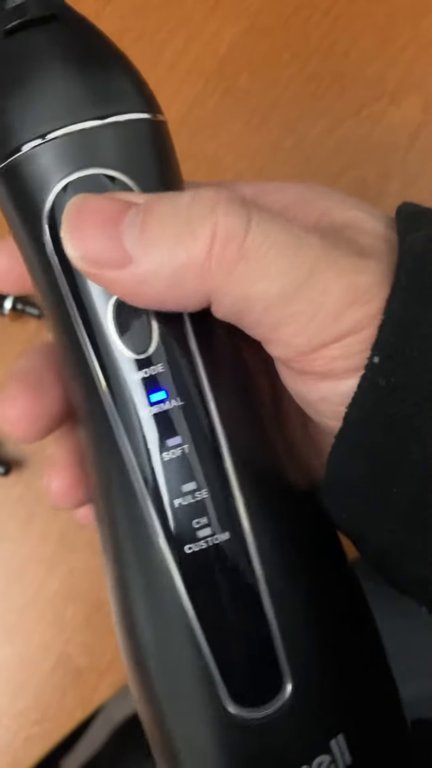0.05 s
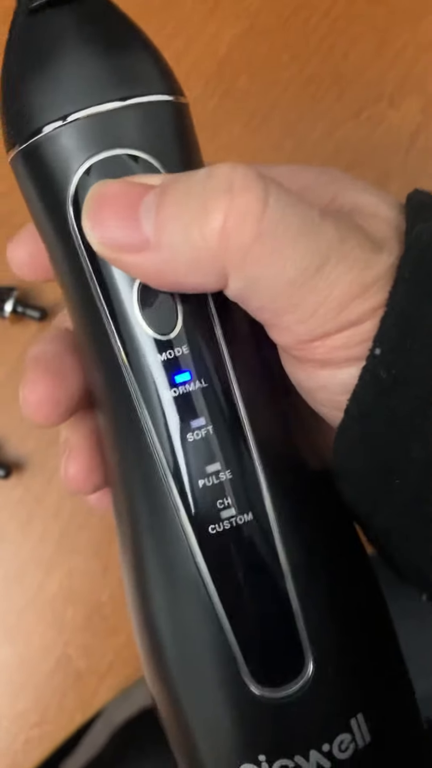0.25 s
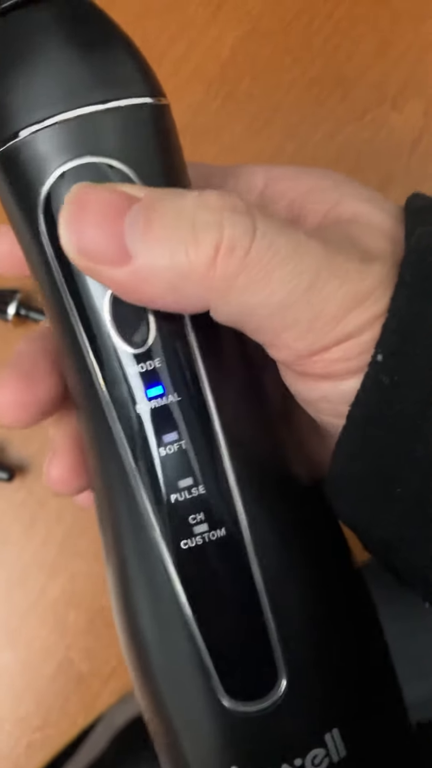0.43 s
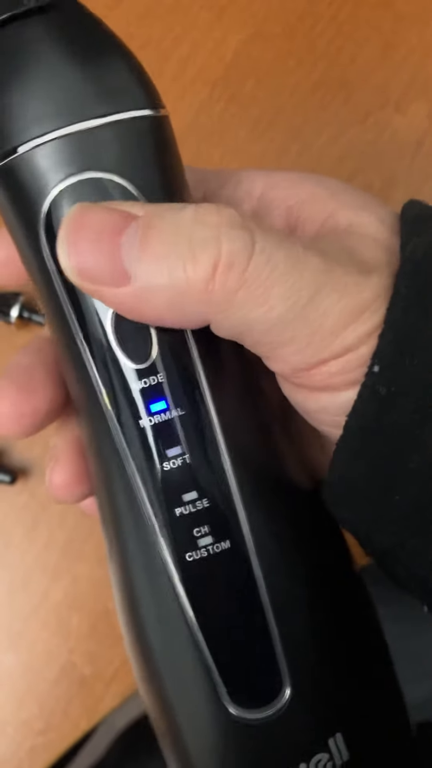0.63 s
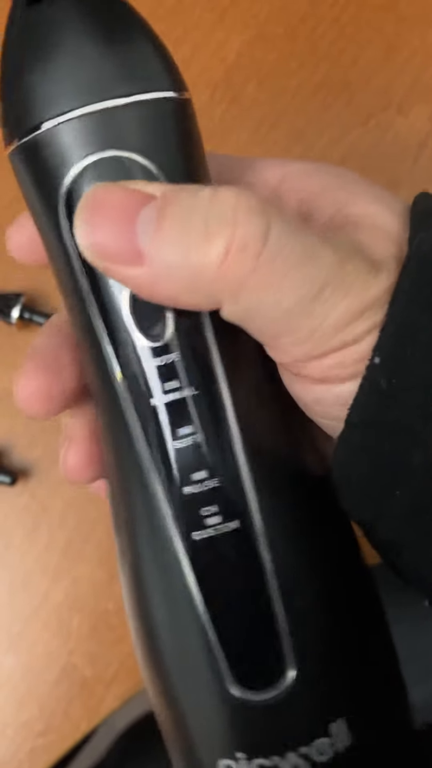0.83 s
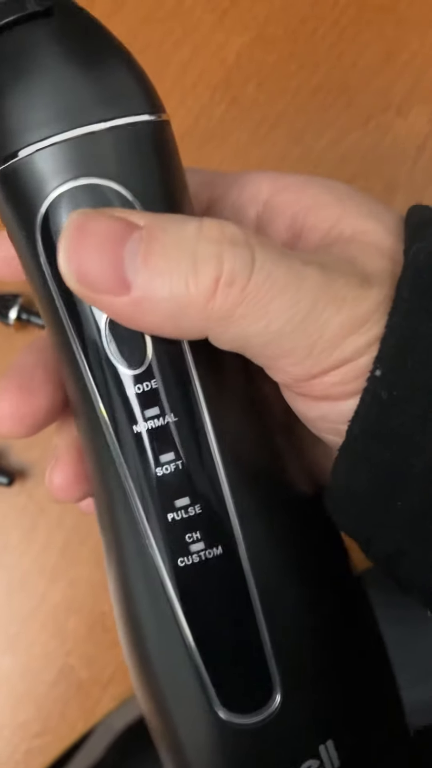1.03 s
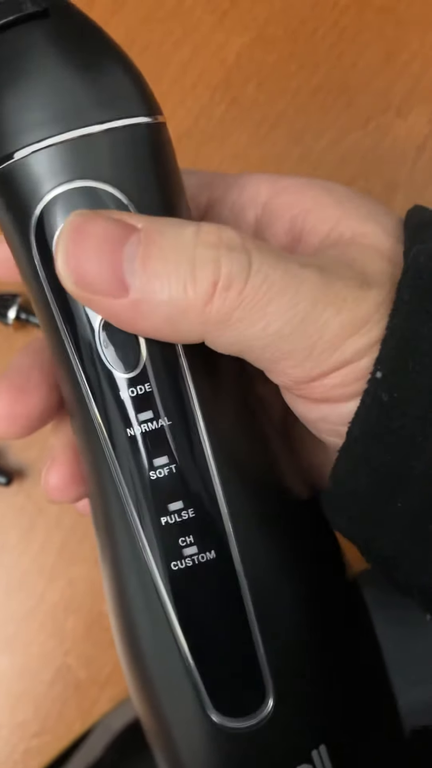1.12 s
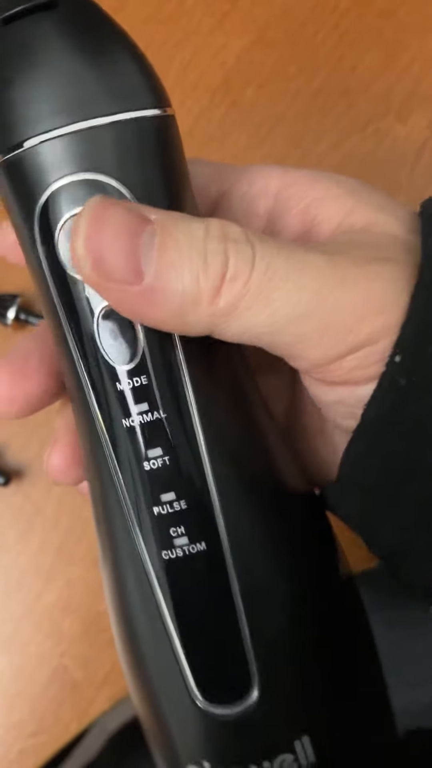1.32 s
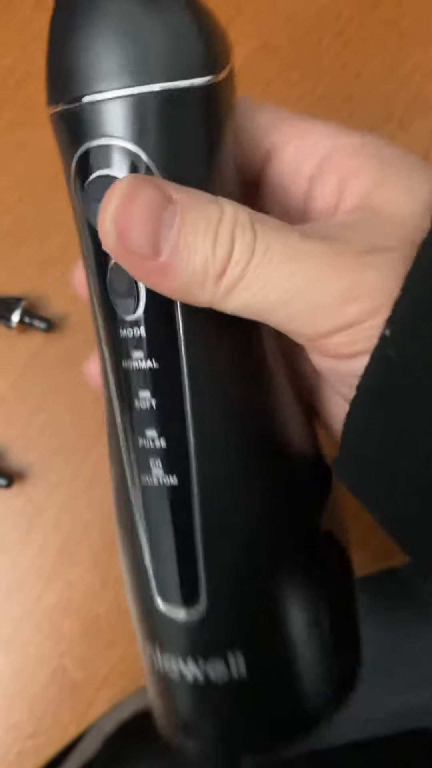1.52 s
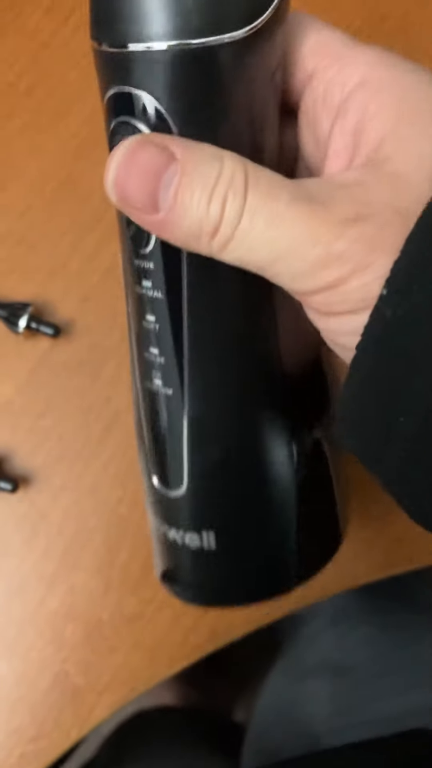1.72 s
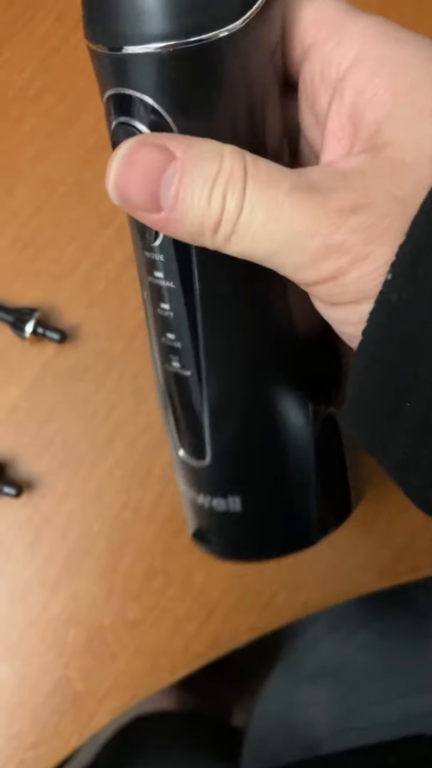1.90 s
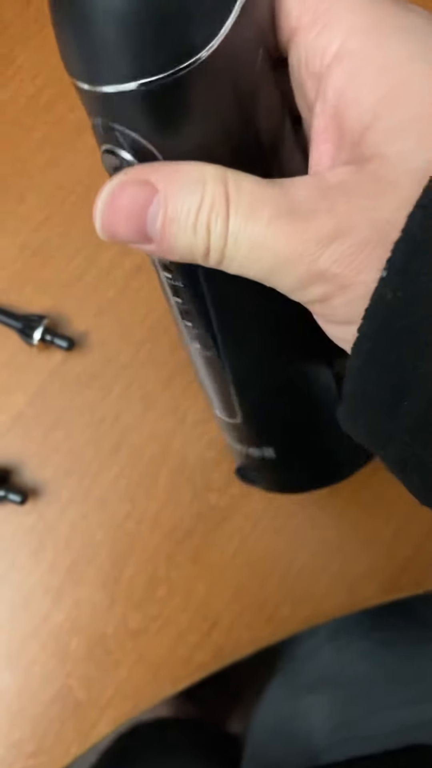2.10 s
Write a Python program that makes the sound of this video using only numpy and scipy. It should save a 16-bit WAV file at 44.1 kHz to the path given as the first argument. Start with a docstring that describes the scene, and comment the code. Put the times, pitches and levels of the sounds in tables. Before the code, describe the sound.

A small hand-held water flosser motor clicks on, buzzes harshly under a second, then winds down

```python
"""A faint appliance hum and soft noise fill a quiet room; a hand-held water flosser's button clicks close by.
Its small motor spins up and runs dry for under a second: jittered impacts of teeth and slack ring the case,
steady multiples of the shaft speed whine and whistle, noise and ticks make the brush rasp, the piston knocks.
As the motor coasts down, the hand starts to shift on the case: low swelling tones make soft thuds,
short impulses make ticks, and a trace of cloth noise brushes by."""
import sys
import numpy as np
from scipy import signal
from scipy.fft import rfft, irfft, next_fast_len
from scipy.io import wavfile
from scipy.ndimage import map_coordinates

SR = 44100
rng = np.random.default_rng(int(sys.argv[2]) if len(sys.argv) > 2 else 0)


def unload_wav(signal):
    """Save mono or channel-first audio to the path in sys.argv[1] as 16-bit WAV at rate SR, clipped to [-1, 1]."""
    wavfile.write(
        sys.argv[1],
        SR,
        np.round(np.clip(np.atleast_2d(signal).T, -1, 1) * 32767).astype(np.int16),
    )


N = 94815

# Speed of the motor shaft. Each row: time in seconds, speed in Hz.
SHAFT_SPEED = [(.21, 70), (.25, 138), (.29, 150), (.335, 153.6), (.4, 154.8), (.6, 154.9), (.735, 155.2),
               (.8, 148), (.86, 128), (.92, 120), (1.0, 114), (1.12, 92)]
# Colour of the bright brush rasp, which the piston's snap shares. Each row: frequency in Hz, relative level in dB.
RASP_COLOUR = [(1500, -30), (2800, -8.5), (3500, -1), (4500, -2.5), (5400, -10.5), (5950, 1.5), (6220, 2.5),
               (6480, 2), (7000, 0.5), (7500, 0.5), (7900, -2), (8200, -10), (8650, -7.5), (9050, -1),
               (9500, -7.5), (10000, -11), (10900, -19), (11400, -24), (13500, -16), (15700, -28.5)]

SWITCH_ON_S = .21
FULL_SPEED_HZ = 155
TONE_FADE_DB_PER_HZ = 2  # whine and whistle fade as the shaft slows
TEETH, SEGMENTS = 10, 6  # gear teeth and commutator segments that pass in one turn
TURNS_PER_STROKE = 4.615
STROKE_START = .506  # offset of the pump's cycle at time zero, as a fraction of a stroke
GEAR_STROKE_DB, BRUSH_STROKE_DB = 3.5, 0.88  # swing of the level with the pump's load, up and down
MESH_DB, MESH_SCATTER_DB, MESH_JITTER_S = -4, 4, .00005
RATTLE_DB, RATTLE_SCATTER_DB, RATTLE_JITTER_S = -3, 2.5, 0.00048
SCRAPE_DB, BRUSH_SCATTER_DB, BRUSH_JITTER_S = 5, 8, .00002
WHINE_WAVER_DB, WHISTLE_WAVER_DB = 5, 1
KNOCK_SNAP_DB = -17  # against the knock's body
PRESS_S = .1585  # the button bottoms out
RUB_DB = -11.5  # skin noise against the amplitude of the thud
SLEEVE_S, SLEEVE_HALF_S, SLEEVE_DB = 1.59, 0.02, -89  # centre, half length, level
GEAR_WET_DB, BRUSH_WET_DB, CLICK_WET_DB = -6.5, -14, -7  # reflections against direct sound
TOP_HZ = 15850


def amp(db):
    """Decibels to gain."""
    return 10 ** (np.asarray(db) / 20)


def unit(x):
    """Scale to rms 1."""
    return x / np.sqrt(np.mean(x ** 2) + 1e-20)


def along(points, hz):
    """Read (Hz, value) points on a log frequency axis."""
    f, v = np.transpose(points)
    return np.interp(np.log(hz + 1), np.log(f + 1), v)


def curve(rows):
    """Read (s, value) points at every sample."""
    return np.interp(np.arange(N) / SR, *np.transpose(rows))


def wobble(rate):
    """A smooth random curve with rate knots a second."""
    knots = rng.standard_normal(int(N * rate / SR) + 4)
    return map_coordinates(knots, [np.arange(N) * rate / SR])


def filtered(x, response):
    """Apply a response given as a function of frequency."""
    m = 2 * next_fast_len(N)
    return irfft(rfft(x, m) * response(np.fft.rfftfreq(m, 1 / SR)), m)[..., :N]


def noise(points):
    """Coloured noise of rms 1."""
    return unit(filtered(rng.standard_normal(N), lambda hz: amp(along(points, hz))))


def ring(points, size=2048):
    """Causal (minimum-phase) impulse response of energy 1 with the given colour."""
    cepstrum = irfft(np.log(amp(along(points, np.fft.rfftfreq(size, 1 / SR)))))
    # fold the cepstrum onto positive time
    cepstrum[1:size // 2] *= 2
    cepstrum[size // 2:] = 0
    h = irfft(np.exp(rfft(cepstrum)))
    return h / np.linalg.norm(h)


def through(x, h):
    """Excite an impulse response."""
    return signal.fftconvolve(x, h)[:N]


def pulses(times, sizes, order=8):
    """Impulses placed between samples with a windowed sinc."""
    at = np.asarray(times)[:, None] * SR
    i = np.floor(at).astype(int) + np.arange(1 - order, order + 1)
    w = np.sinc(i - at) * np.cos(np.pi * (i - at) / (2 * order)) ** 2
    sized = w * np.asarray(sizes)[:, None]
    return np.bincount(np.clip(i, 0, N).ravel(), sized.ravel(), N + 1)[:N]


def contacts(cycles, scatter_db, jitter_s, count=1):
    """One uneven impact per cycle; the wear pattern repeats after count of them."""
    k = np.arange(1, int(cycles[-1]))
    wear = rng.standard_normal((count, 2))[k % count]
    chance = rng.standard_normal((N // 10, 2))[k]
    times = np.interp(k, cycles, np.arange(N) / SR)
    times = times + jitter_s * (chance[:, 0] + wear[:, 0])
    strength = chance[:, 1] + wear[:, 1] * (count > 1)
    return unit(pulses(times, amp(scatter_db * np.clip(strength, -2, 2))))


def case():
    """Response of the plastic case: a short coloured crack plus decaying modes."""
    # Colour of the crack. Each row: frequency in Hz, relative level in dB.
    crack_colour = [(100, -40), (260, -34), (470, -22), (620, -30.5), (720, -20), (830, 0.5), (1150, -8.5),
                    (1430, -4), (1600, -4.5), (1900, 1), (2250, -2), (2500, -13), (3450, -8.5),
                    (4400, -22.5), (6000, -25.5), (9000, -28.5), (15000, -57.5)]
    # Ringing modes. Each row: frequency in Hz, relative level in dB, time to fall 60 dB in seconds.
    modes = [(505, -42.5, 0.046), (890, -34.5, .025), (915, -33, 0.029), (1098, -40.5, .06),
             (1360, -33, 0.067), (1601.5, -21, 0.074), (1680, -32, 0.09), (1846, -26, 0.029),
             (2178, -30.5, 0.061), (2298, -32.5, .05), (2595, -34, 0.12), (3160, -29.5, 0.015),
             (3382, -26, 0.033)]
    t = np.arange(SR // 8) / SR
    h = sum(amp(db - 60 * t / t60) * np.cos(2 * np.pi * hz * t) for hz, db, t60 in modes)
    h = h * amp(-3)
    crack = ring(crack_colour)
    h[:len(crack)] += crack
    return h / np.linalg.norm(h)


def placed(x, wet_db):
    """Stereo direct sound plus short noise-tail reflections that crossfade to a new set every 0.2 s."""
    # Level difference. Each row: frequency in Hz, left minus right in dB.
    tilt = [(100, 0.5), (400, 1), (800, -7), (1200, -2.5), (1550, -4.5), (2300, -8), (2900, 0.5),
            (3500, -1), (5000, -0.5)]
    # Phase difference. Each row: frequency in Hz, lead of the left in radians.
    lead = [(100, 0), (500, -.3), (950, -1.3), (1350, -1.1), (1550, .4), (1800, 0), (2200, .9),
            (2900, -1.5), (3150, 0), (3500, -2.8), (3750, -2.6), (4200, .8), (4450, .9), (4750, 3),
            (5500, 3.2), (7000, 4.6), (8000, 6.1), (9000, 6.4), (10200, 7.7), (11000, 9.3), (12500, 9.5),
            (14000, 12.4)]
    # Decay of the reflections. Each row: frequency in Hz, time to fall 60 dB in seconds.
    decay = [(200, 0.087), (1500, 0.16), (8000, 0.019)]
    direct = filtered(x, lambda hz: np.exp(np.outer([.5j, -.5j], along(lead, hz))))
    wet = np.zeros((2, N))
    step = SR // 5
    for centre in range(0, N + step, step):
        hz, t, z = signal.stft(rng.standard_normal((2, SR // 5)), SR, nperseg=256)
        tails = signal.istft(z * amp(-60 * t / along(decay, hz)[:, None]), SR, nperseg=256)[1]
        # equal-power crossfade between neighbouring sets
        part = x * np.sqrt(np.clip(1 - abs(np.arange(N) - centre) / step, 0, 1))
        wet += [through(part, h / np.linalg.norm(h)) for h in tails]
    both = (direct + amp(wet_db) * wet) / np.hypot(1, amp(wet_db))
    return filtered(both, lambda hz: amp(np.outer([.5, -.5], along(tilt, hz))))


def room_tone():
    """A slightly unsteady hum of sines in soft, wide room noise."""
    # Appliance hum. Each row: frequency in Hz, relative level in dB.
    hum_partials = [(59.4, -67), (118.6, -73), (297, -70.5), (348.5, -66.5), (506, -81.5), (694.6, -78),
                    (1324, -83.5)]
    # Colour of the room noise. Each row: frequency in Hz, relative level in dB.
    air_colour = [(20, -36.5), (40, -22), (65, 1.5), (88, -17.5), (125, -16), (170, -16.5), (260, -20),
                  (330, -13), (400, -26), (680, -24.5), (800, -37), (1000, -39.5), (1350, -29),
                  (1900, -39.5), (2600, -47.5), (5400, -57.5), (7500, -53), (9500, -49), (11500, -64.5),
                  (14000, -57.5), (15500, -55)]
    # Width of the room noise. Each row: frequency in Hz, side against mid in dB.
    air_width = [(100, -13), (400, 0), (1500, 6.5), (8000, -2.5)]
    # Course of the room noise. Each row: time in seconds, relative level in dB.
    air_level = [(0, -59.5), (.15, -66.5), (1.0, -59.5), (1.3, -61.5), (1.6, -60.5), (2.15, -61)]
    t = np.arange(N) / SR
    hum = 0
    for hz, db in hum_partials:
        level = np.sqrt(2) * amp(db + 2.5 * wobble(7.8))
        hum = hum + level * np.sin(2 * np.pi * hz * t + 0.48 * wobble(7))
    mid, side = filtered(rng.standard_normal((2, N)), lambda hz: amp(along(air_colour, hz)))
    side = filtered(side, lambda hz: amp(along(air_width, hz)))
    air = amp(curve(air_level)) * unit(np.array([mid + side, mid - side]))
    return (hum + air) * amp([[1.1], [-1.1]])  # left a little louder


def sleeve():
    """A very faint brush of cloth: a short swell of coloured noise."""
    # Colour of the cloth. Each row: frequency in Hz, relative level in dB.
    cloth_colour = [(1000, -19), (4000, -10), (8000, 3), (11000, -6.5), (14500, 3), (16000, -0.5)]
    swell = np.exp(-((np.arange(N) / SR - SLEEVE_S) / SLEEVE_HALF_S) ** 2)
    return amp(SLEEVE_DB) * swell * noise(cloth_colour)


def thuds():
    """The grip shifts: bell-shaped swells of a low tone with rubbing skin noise."""
    # Thuds of the grip. Each row: centre in seconds, half length in seconds, pitch in Hz, relative level in dB.
    grip_shifts = [(.98, 0.042, 131, -54), (1.148, 0.029, 129.3, -48), (1.248, 0.021, 127, -45),
                   (1.293, 0.032, 124.2, -36.5), (1.906, 0.02, 116.4, -39), (1.925, 0.0064, 112, -42),
                   (1.92, 0.017, 58, -44.5), (1.967, 0.016, 52, -43.5)]
    # Colour of the rubbing skin. Each row: frequency in Hz, relative level in dB.
    skin_colour = [(20, -22), (50, 4), (130, -1), (220, -13), (400, -27), (1000, -65), (3000, -95)]
    t = np.arange(N) / SR
    rub = amp(RUB_DB) * noise(skin_colour)
    low = 0
    for s, half, hz, db in grip_shifts:
        swell = amp(db) * np.exp(-((t - s) / half) ** 2)
        low = low + swell * (np.cos(2 * np.pi * hz * (t - s)) + rub)
    return low * amp([[1.2], [-1.2]])  # left a little louder


def clicks():
    """Button, drive and case click: impulses ring the case and a bright snap; the pressed button rings its modes."""
    # Clicks of button, drive and case. Each row: time in seconds, body level in dB, snap level in dB.
    click_rows = [(.1575, -29, -35), (.184, -45.5, -54.5), (.1945, -38, -47.5), (.231, -20, -12),
                  (1.35, -48, -38.5), (1.793, -52, -53.5), (1.825, -57, -55), (1.938, -46.5, -54.5),
                  (2.058, -48, -65.5)]
    # Modes of the button bottoming out. Each row: frequency in Hz, level in dB, time to fall 60 dB in seconds.
    press_modes = [(476.6, -49, 0.042), (861, -41.5, 0.046), (1050, -48, .02), (1510, -53, .025),
                   (2200, -46.5, 0.022)]
    # Colour of a plastic snap. Each row: frequency in Hz, relative level in dB.
    snap_colour = [(1000, -19), (2200, -8.5), (3500, -15.5), (4400, 5), (5400, 0), (6700, -6.5),
                   (7900, 0.5), (9000, -5.5), (10000, -19), (13000, -14), (16000, -26)]
    s, body_db, snap_db = np.transpose(click_rows)
    t = np.maximum(np.arange(N) / SR - PRESS_S, 0)
    press = sum(amp(db - 60 * t / t60) * np.sin(2 * np.pi * hz * t) for hz, db, t60 in press_modes)
    body = through(pulses(s, amp(body_db)), case())
    snap = through(pulses(s, amp(snap_db)), ring(snap_colour))
    return press + body + snap


def knocks():
    """Now and then the dry piston strikes hard: impulses into the case with a bright snap."""
    # Hard knocks of the piston. Each row: time in seconds, level in dB.
    piston_blows = [(.2535, -11), (.293, -5.5), (0.348, -10), (0.383, -8.5), (.443, -4.5), (0.502, -3.5),
                    (.504, -7.5), (0.591, -8), (.609, -7.5), (0.653, -9.5), (.778, -6), (0.801, -8.5),
                    (.804, -5.5), (.834, -12.5), (.878, -8), (.952, -9.5), (.961, -15.5), (0.988, -17.5),
                    (0.997, -20)]
    s, db = np.transpose(piston_blows)
    blows = pulses(s, amp(db))
    return through(blows, case()) + amp(KNOCK_SNAP_DB) * through(blows, ring(RASP_COLOUR))


def tones(turns, orders, waver_db):
    """Slightly unsteady sines at multiples of the shaft speed, fading as it slows."""
    fade_db = TONE_FADE_DB_PER_HZ * (curve(SHAFT_SPEED) - FULL_SPEED_HZ)
    total = 0
    for k, db in orders:
        level = amp(db + waver_db * wobble(30))
        total = total + level * np.sin(2 * np.pi * k * turns + 0.34 * wobble(18))
    return amp(fade_db) * total


def brushes(turns, load):
    """The brushes tick over each commutator segment, scrape in between and whistle."""
    # Course of the brushes. Each row: time in seconds, level in dB.
    brush_level = [(.215, -81.5), (.235, -42.5), (.28, -35.5), (.35, -32.5), (.6, -32), (.8, -35.5),
                   (.88, -39.5), (1.0, -51.5), (1.08, -67), (1.13, -92)]
    # Whistle of the commutator. Each row: multiple of the shaft speed, relative level in dB.
    whistle = [(42, -20.5), (48, -19.5), (54, -18.5), (60, -19.5), (61, -17.5)]
    ticks = contacts(SEGMENTS * turns, BRUSH_SCATTER_DB, BRUSH_JITTER_S, count=6)
    # the scrape swells once and twice a turn
    swell_db = 1.1 * np.cos(4 * np.pi * turns) + 0.97 * np.cos(2 * np.pi * turns)
    scrape = unit(rng.standard_normal(N) * amp(swell_db))
    level = amp(curve(brush_level) + BRUSH_STROKE_DB * load)
    rasp = through(level * unit(ticks + amp(SCRAPE_DB) * scrape), ring(RASP_COLOUR))
    return rasp + level * tones(turns, whistle, WHISTLE_WAVER_DB)


def gears(turns, load):
    """Teeth mesh and whine; the slack rattles twice a turn; both impacts hit harder under the pump's load."""
    # Course of the gear train. Each row: time in seconds, level in dB.
    gear_level = [(.212, -61.5), (.22, -47.5), (.235, -31.5), (.27, -31.5), (.45, -32), (.59, -31),
                  (.72, -34), (.81, -33.5), (.885, -35.5), (.915, -40.5), (.96, -42.5), (1.04, -49.5),
                  (1.1, -67.5), (1.14, -84.5)]
    # Clean whine. Each row: multiple of the shaft speed, relative level in dB.
    whine = [(1, -30.5), (3, -19), (7, -18.5), (8, -17), (9, -23), (10, -6), (12, -16.5), (17, -15)]
    mesh = contacts(TEETH * turns, MESH_SCATTER_DB, MESH_JITTER_S, count=10)
    rattle = contacts(2 * turns, RATTLE_SCATTER_DB, RATTLE_JITTER_S)
    impacts = amp(MESH_DB) * mesh + amp(RATTLE_DB) * rattle
    level = amp(curve(gear_level))
    body = through(level * unit(amp(GEAR_STROKE_DB * load)) * impacts, case())
    return body + level * tones(turns, whine, WHINE_WAVER_DB)


def scene():
    """Once switched on, the shaft drives gears, pump and brushes; hand and room sound around them."""
    turns = np.cumsum(curve(SHAFT_SPEED)) / SR
    running = np.arange(N) / SR > SWITCH_ON_S
    load = np.cos(2 * np.pi * (turns / TURNS_PER_STROKE + STROKE_START))
    drive = placed(running * gears(turns, load) + knocks(), GEAR_WET_DB)
    rasp = placed(running * brushes(turns, load), BRUSH_WET_DB)
    return room_tone() + sleeve() + thuds() + placed(clicks(), CLICK_WET_DB) + rasp + drive


def record(dry):
    """Cut everything from the band limit up."""
    return filtered(dry, lambda hz: hz < TOP_HZ)


dry = scene()
out = record(dry)
unload_wav(out)
```